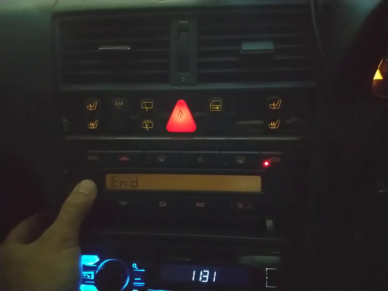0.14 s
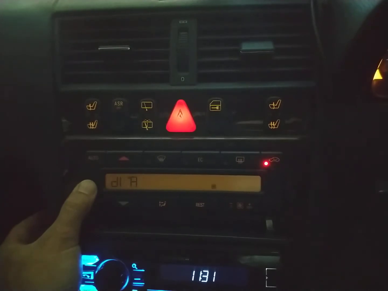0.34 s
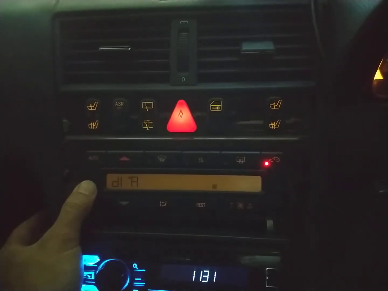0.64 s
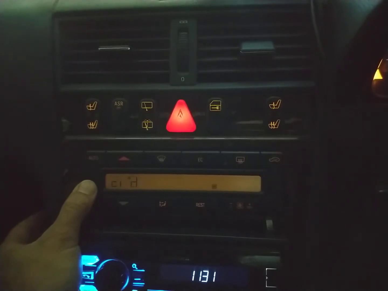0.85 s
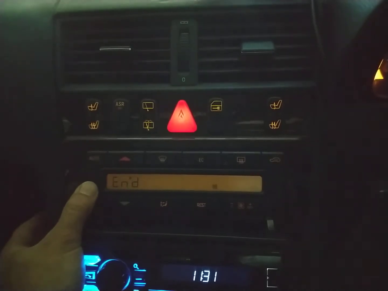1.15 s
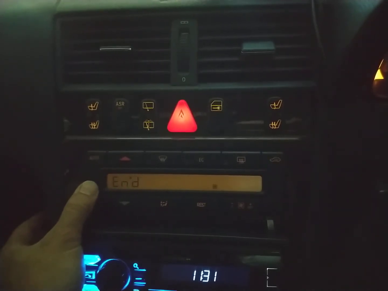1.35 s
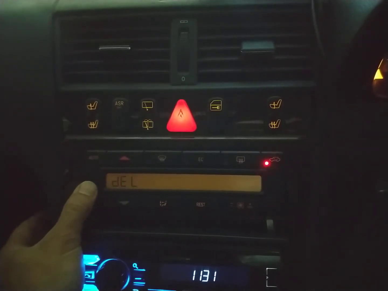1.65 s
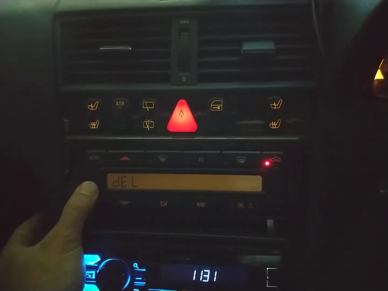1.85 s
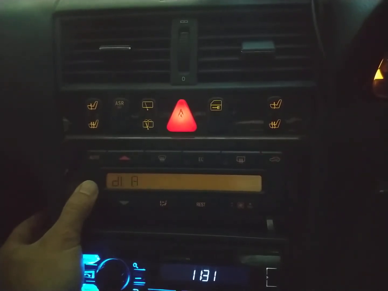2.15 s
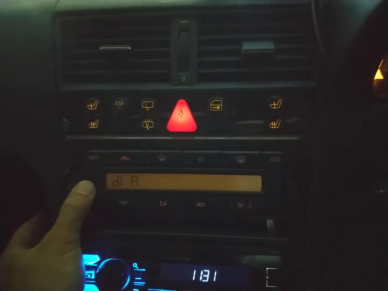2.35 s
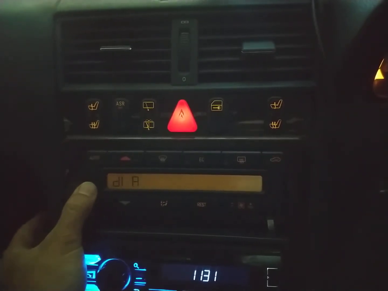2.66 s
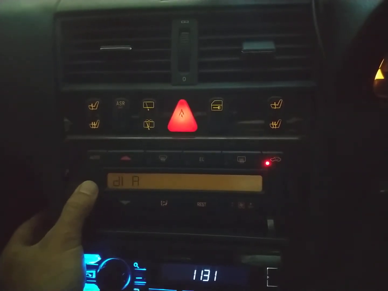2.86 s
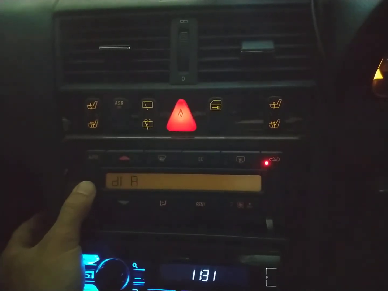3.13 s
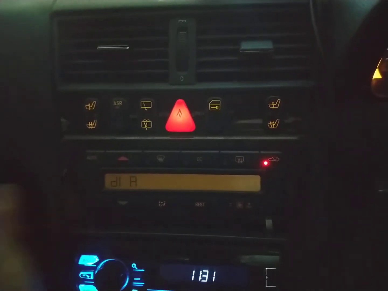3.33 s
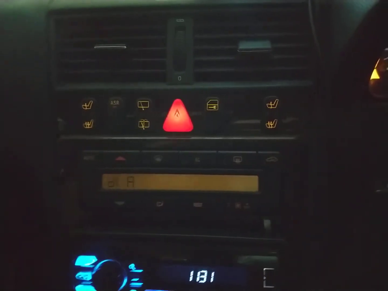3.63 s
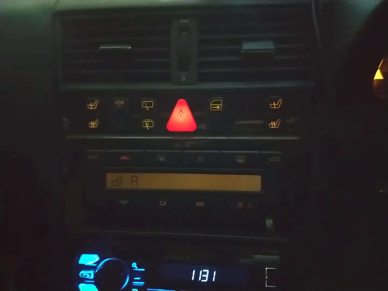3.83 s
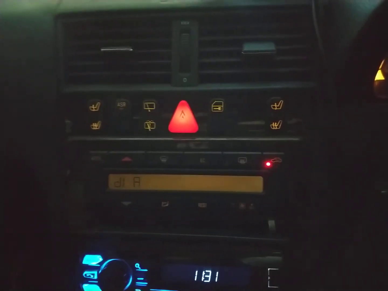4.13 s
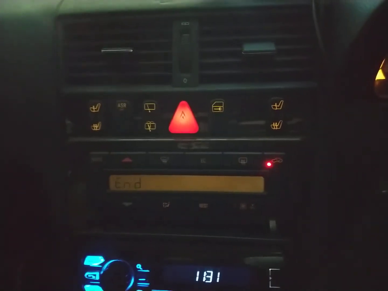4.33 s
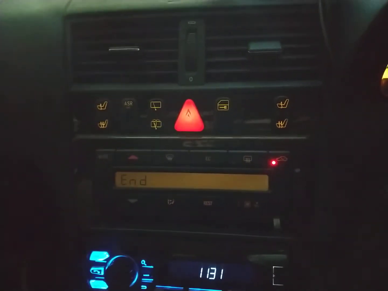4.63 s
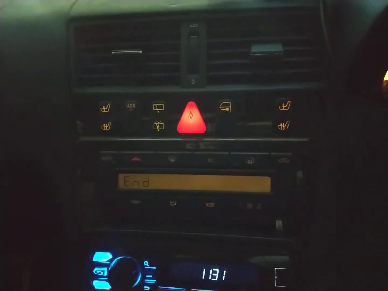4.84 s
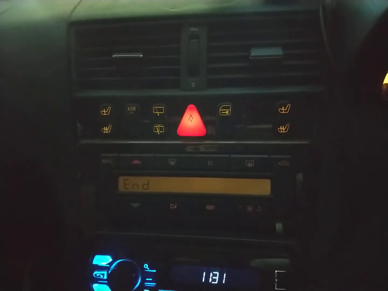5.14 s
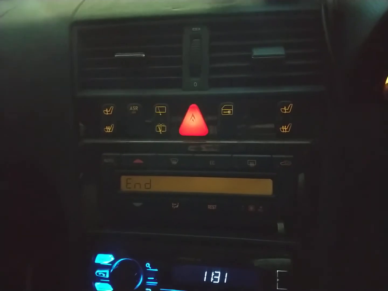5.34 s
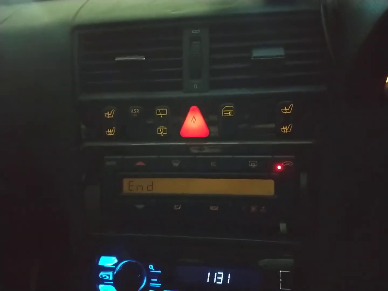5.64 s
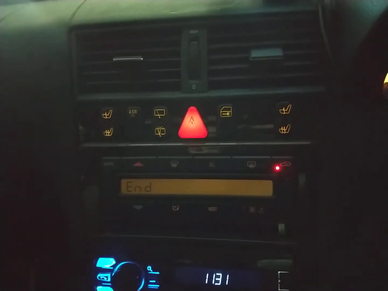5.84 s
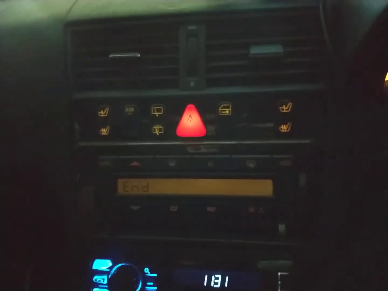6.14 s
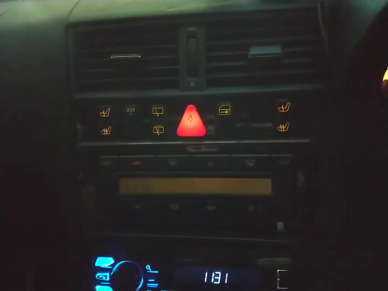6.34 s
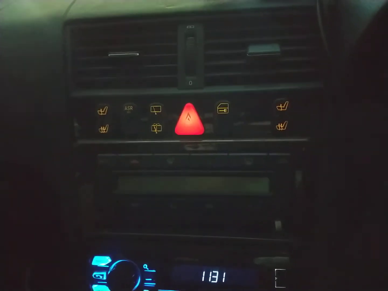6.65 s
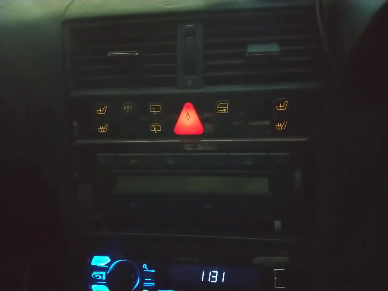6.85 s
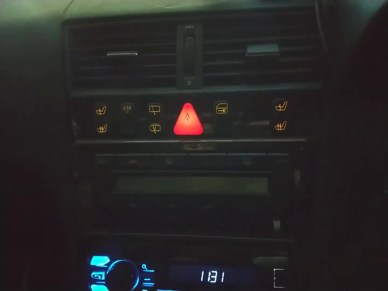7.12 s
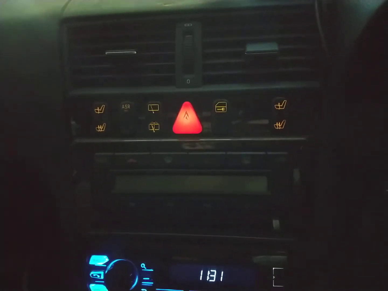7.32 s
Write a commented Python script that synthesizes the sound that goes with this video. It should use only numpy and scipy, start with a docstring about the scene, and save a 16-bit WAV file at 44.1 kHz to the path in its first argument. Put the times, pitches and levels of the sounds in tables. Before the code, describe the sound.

In a hushed closed car, a panel button snaps down and pops back five times; light handling ticks follow, then an ignition clack and faint relay.

```python
"""Climate button in a quiet car cabin

Inside a closed car, a thumb presses and releases a plastic button on the climate panel five times.
Each stroke is a shaped burst of contacts that rings the fascia's modes and thumps the dashboard's low ones.
Then come soft knocks on the trim, creaks and ticks on the microphone's own case, and the ignition key
clacking off with a short jingle of its modes; a relay under the dash follows.
Underneath lie filtered-noise cabin air and a faint low hum that sinks slowly."""
import sys
import numpy as np
from scipy import signal
from scipy.io import wavfile
from scipy.ndimage import uniform_filter1d

SR = 44100
rng = np.random.default_rng(int(sys.argv[2]) if len(sys.argv) > 2 else 0)


def store_pcm(level_fs):
    """Save levels as 16-bit WAV."""
    pcm = np.round(np.clip(level_fs, -1, 1) * 32767).astype(np.int16)
    wavfile.write(sys.argv[1], SR, np.atleast_2d(pcm).T)


N = 329850
T = np.arange(N) / SR
RING = T[:6144]  # time axis of one short sound, in seconds


def gain_of(db):
    """Decibels to an amplitude factor."""
    return 10 ** (np.asarray(db) / 20)


def unit(x):
    """Scales to energy 1."""
    return x / np.sqrt(np.sum(x ** 2) + 1e-20)


def read(points, hz):
    """Reads a curve of (hz, value) points on a log-frequency axis."""
    f, value = np.transpose(points)
    return np.interp(np.log(hz + 1), np.log(f + 1), value)


def add(mix, s, sound):
    """Mixes a sound in at time s."""
    part = mix[max(round(s * SR), 0):][:len(sound)]
    part += sound[:len(part)]


def causal(spectrum, gain):
    """Applies a gain with minimum phase, so that attacks stay sharp."""
    log_response = np.conj(signal.hilbert(np.log(gain)))
    return np.fft.ifft(spectrum * np.exp(log_response)).real


def coloured(x, points, size=4096):
    """Filters with the given spectrum, all of it scaled by 0.62."""
    hz = abs(np.fft.fftfreq(size, 1 / SR))
    kernel = causal(0.62, gain_of(read(points, hz)))
    return signal.oaconvolve(x, kernel)[:len(x)]


def even(x, size=80):
    """Gives a burst the same energy in every band, keeping its fine structure."""
    z = np.fft.fft(x, 2 * len(x))
    power = uniform_filter1d(abs(z) ** 2, 2 * size, mode="wrap")
    power = uniform_filter1d(power, size, mode="wrap")
    return unit(causal(z, (power + 1e-12) ** -.5)[:len(x)])


def drift(rate_hz, count=20):
    """Slow random wandering of rms 1, a sum of sines up to rate_hz."""
    t = np.linspace(0, T[-1], count * count)
    rates = np.geomspace(rate_hz / 10, rate_hz, count)
    waves = sum(np.sin(2 * np.pi * (f * t + rng.random())) for f in rates)
    return np.interp(T, t, waves / waves.std())


def ring(modes, scatter=1):
    """Dying sines that build up in a fraction of a cycle, their phases scattered by the path to the ear."""
    body = np.zeros(len(RING))
    for hz, db, t60 in modes:
        envelope = gain_of(db - 60 * RING / t60) * (1 - np.exp(-2 * hz * RING))
        body += envelope * np.sin(2 * np.pi * (hz * RING + scatter * rng.random()))
    return unit(body)


def chatter(t60):
    """A dying burst of tiny contacts and reflections."""
    return even(rng.standard_normal(len(RING)) * gain_of(-60 * RING / t60))


# how fast the padded cabin falls silent: pitch_hz, t60_s
CABIN_DECAY = [(100, 0.14), (400, 0.14), (1500, 0.065), (4000, 0.076), (8000, 0.095), (14000, 0.073)]


def cabin_tail(size=128):
    """The short reverberation of the padded cabin: noise that dies at its own rate in each band."""
    hz, t, z = signal.stft(rng.standard_normal(len(RING)), SR, nperseg=size)
    decay = gain_of(-60 * t / read(CABIN_DECAY, hz)[:, None])
    tail = signal.istft(z * decay, SR, nperseg=size)[1][:len(RING)]
    return unit(tail * (1 - np.exp(-RING / 0.0022)))  # reflections gather over a few ms


def blows(rows, colour, modes, crack_db, chatter_db, chatter_t60, room_db, variety=0.53):
    """A blow is a crack, chatter, the object's modes and the cabin's answer; blows on one object are alike.

    Rows: start_s, level_db (energy with ringing and blow weighed separately), bright_db_per_octave, ring_db."""
    out = np.zeros(N)
    body, burst, room = ring(modes), chatter(chatter_t60), cabin_tail()
    for s, db, bright, ring_db in rows:
        crack = gain_of(crack_db) * (RING == 0)
        contact = crack + gain_of(chatter_db) * unit(burst + variety * chatter(chatter_t60))
        heard = even(contact + gain_of(room_db) * unit(room + variety * cabin_tail()))
        ringing = gain_of(ring_db) * unit(body + variety * ring(modes))
        sound = unit(coloured(heard, colour)) + ringing
        # brightness pivots at 2 kHz; the ringing adds its energy to the level
        tilt = [(hz, bright * np.log2(hz / 2000)) for hz in (250, 16000)]
        add(out, s, gain_of(db) * np.linalg.norm(sound) * unit(coloured(sound, tilt)))
    return out


def alike(rows, bright, ring_db):
    """Gives blows of one kind the same brightness (dB per octave) and ringing."""
    return [(s, db, bright, ring_db) for s, db in rows]


# spectrum of the cabin air: pitch_hz, level_db (relative, per Hz)
AIR_COLOUR = [(12, -54), (24, -33.5), (38, -7), (70, -7), (110, -10), (170, -14.5), (230, -16), (513, -19),
              (865, -22), (1500, -26), (3720, -30), (8000, -34.5), (10500, -37.5), (14300, -34)]
AIR_DB = -66  # rms of the air between 200 and 2000 Hz


def air():
    """Steady rumble and hiss of the closed cabin, as filtered noise."""
    noise = coloured(rng.standard_normal(N), AIR_COLOUR, size=16384)
    band = signal.butter(4, [200, 2000], "band", fs=SR, output="sos")
    middle = signal.sosfilt(band, noise)
    return noise / middle.std() * gain_of(AIR_DB)


HUM_HZ, HUM_SINKS_S, HUM_SAG_HZ_PER_S = 57.2, 2.8, 4.5  # holds its pitch, then sinks steadily
# course of the low hum, around which it wavers: time_s, level_db (rms)
HUM_LEVEL = [(0, -59.5), (.4, -57), (1.8, -54), (2.4, -55), (2.7, -61.5), (4.2, -68), (7.48, -72)]


def hum():
    """A low tone that sinks and fades, and a fainter steady one above it, both wavering slightly."""
    hz = HUM_HZ - HUM_SAG_HZ_PER_S * np.maximum(T - HUM_SINKS_S, 0)
    turns = np.cumsum(hz + 0.44 * drift(3.5)) / SR
    low_db = np.interp(T, *np.transpose(HUM_LEVEL)) + .8 * drift(8)
    low = gain_of(low_db) * np.sin(2 * np.pi * turns)
    steady_turns = np.cumsum(142 + 1.5 * drift(6)) / SR
    steady = gain_of(-72 + 2 * drift(5)) * np.sin(2 * np.pi * steady_turns)
    return np.sqrt(2) * (low + steady)  # rms level to sine peak


# the hand brushing along trim and keys: start_s, length_s, level_db (rms at mid-stroke, before flutter)
BRUSHES = [(3.735, 0.18, -63), (4.328, 0.26, -68.5), (5.34, 0.19, -69)]
# skin sliding on trim and keys: pitch_hz, level_db (relative, per Hz)
BRUSH_COLOUR = [(200, -30), (1600, -12), (2120, 8.5), (2500, -7), (3600, 5.5), (5500, -2), (8000, 1.5),
                (10000, -12), (14000, -15)]


def brushes():
    """Soft, uneven hiss of skin sliding: filtered noise that swells, fades and flutters."""
    strokes = np.zeros(N)
    for s, length, db in BRUSHES:
        add(strokes, s, gain_of(db) * np.hanning(int(length * SR)))
    hiss = coloured(rng.standard_normal(N), BRUSH_COLOUR)
    return strokes * hiss / hiss.std() * gain_of(2 * drift(25))


# modes of the fascia, also rung by scuffs and button: pitch_hz, level_db (relative), t60_s
FASCIA_MODES = [(605, -1.5, 0.11), (1046, -6, 0.078), (1423, 4, 0.073), (1667, -11, 0.1),
                (2110, 6.5, 0.025), (2580, -19, .045), (2723, 17.5, 0.015), (3390, -15, 0.081),
                (3000, -47, .055), (3490, 2, 0.03), (3554, 16.5, 0.012), (4000, -19, 0.03),
                (4650, -14, 0.095), (7120, 3, 0.022)]
# the relay pulling and settling: start_s, level_db (energy before ringing), bright_db_per_octave
RELAY = [(6.9650, -23.5, -2), (6.98, -26, 5)]
# the relay behind its trim: pitch_hz, level_db (relative, per Hz)
RELAY_COLOUR = [(250, -16), (650, 0), (1500, -3), (2400, 5.5), (3100, -3.5), (3600, 3), (4300, -8),
                (7400, -6), (8500, -16), (14000, -33)]


def relay():
    """A relay under the dash pulls and settles, mostly heard by way of the cabin."""
    rows = [(*row, -17) for row in RELAY]  # ring_db
    return blows(rows, RELAY_COLOUR, FASCIA_MODES,
                 crack_db=-22, chatter_db=-1, chatter_t60=0.035, room_db=1)


# modes of the microphone's case, also rung by the ticks: pitch_hz, level_db (relative), t60_s
CASE_MODES = [(524, -4, 0.016), (1124, 1.5, 0.0089), (3440, -3, 0.0091)]
# creaks as the grip shifts: start_s, level_db (energy before ringing)
CREAKS = [(4.3695, -24), (4.3835, -34), (4.3992, -31), (4.4150, -26), (4.4258, -28)]
# the case creaking: pitch_hz, level_db (relative, per Hz)
CREAK_COLOUR = [(100, 2), (900, -10), (2400, 0.5), (3300, -3.5), (4100, 3.5), (4900, -13), (8000, -11),
                (11000, -26)]


def creaks():
    """The microphone's case creaks in small dull contacts as the grip shifts."""
    return blows(alike(CREAKS, bright=-2.95, ring_db=-17), CREAK_COLOUR, CASE_MODES,
                 crack_db=-5, chatter_db=-1, chatter_t60=0.0049, room_db=-19)


# ticks on the case: start_s, level_db (energy before ringing), bright_db_per_octave, ring_db
TICKS = [(4.5774, -13, 0, -2), (4.5885, -18.5, -2, -10), (4.6168, -7.5, 1, -7.5)]
# a tick on the case: pitch_hz, level_db (relative, per Hz)
TICK_COLOUR = [(100, 3.5), (300, -3), (560, -6), (800, -13.5), (1150, -7), (1650, -5.5), (2200, -0.5),
               (3000, -7), (3550, -1.5), (5000, -5.5), (6800, -7.5), (8300, -1), (9900, -14.5),
               (14000, -13)]


def ticks():
    """Ticks right on the microphone's case: a strong crack, little chatter and hardly any cabin."""
    return blows(TICKS, TICK_COLOUR, CASE_MODES,
                 crack_db=9, chatter_db=-6, chatter_t60=0.0067, room_db=-18)


# scuffs just before the knocks: start_s, level_db (energy before ringing)
SCUFFS = [(3.1700, -18.5), (3.3395, -20.5), (3.3455, -23), (3.5220, -24.5)]
# skin scuffing plastic: pitch_hz, level_db (relative, per Hz)
SCUFF_COLOUR = [(100, -36), (350, 1), (650, 7.5), (950, 0.5), (1300, 2.5), (1600, -11), (2200, 3),
                (2700, -22), (3450, -3.5), (5500, -21), (8000, -15), (11000, -32)]


def scuffs():
    """The hand scuffs the plastic: chatter that dies slowly and barely rings the fascia."""
    return blows(alike(SCUFFS, bright=.2, ring_db=-20), SCUFF_COLOUR, FASCIA_MODES,
                 crack_db=-14, chatter_db=2, chatter_t60=0.05, room_db=-6)


# knocks on the trim: start_s, level_db (energy before ringing), bright_db_per_octave, ring_db
KNOCKS = [(3.1755, -18, 1.5, -4.5), (3.3475, -17.5, 1.5, 5.5), (3.5305, -14, -2, -6)]
# a soft knock: pitch_hz, level_db (relative, per Hz)
KNOCK_COLOUR = [(60, -40), (190, -10), (280, 1.5), (400, 0), (700, -8), (1100, -17.5), (1500, -12),
                (2100, -22), (3500, -17.5), (8000, -41), (14000, -56)]
# modes of the trim: pitch_hz, level_db (relative), t60_s
TRIM_MODES = [(241, -2, 0.1), (270, -3.5, 0.15), (350, -17, .06), (457, -8.5, 0.12), (574, -13, 0.085),
              (760, -20, 0.046)]


def knocks():
    """Soft knocks on the trim: almost no crack, a dull burst and low modes."""
    return blows(KNOCKS, KNOCK_COLOUR, TRIM_MODES,
                 crack_db=-28, chatter_db=2.5, chatter_t60=0.029, room_db=-2)


# ignition lock and hanging keys: start_s, level_db (energy before ringing), bright_db_per_octave, ring_db
CLACKS = [(3.4865, -33, -1.5, -8), (5.535, -29.5, -3.5, -8), (5.690, -35, -2.5, -19),
          (5.763, -36, -4.5, -15), (5.811, -40, -2, 2), (5.835, -37, 1, 0), (6.3700, -18, -2, -22),
          (6.3765, -7.5, -1.5, -12), (6.3805, -6.5, 3, -12)]
# a clack of lock or keys: pitch_hz, level_db (relative, per Hz)
CLACK_COLOUR = [(40, -37), (100, -17), (200, 1.5), (340, -3.5), (720, 4.5), (900, -6), (1080, -1),
                (1350, -9), (1850, 2.5), (2800, -13), (3600, -0.5), (5200, -7.5), (7200, 5), (10000, -15),
                (14000, -17)]
# modes of the keys: pitch_hz, level_db (relative), t60_s
KEY_MODES = [(200, -5, 0.13), (2200, -14, 0.1), (3450, 4, 0.081), (4270, -10, 0.1), (5329, -11, 0.088),
             (5930, -5, 0.11), (6500, -10, 0.074), (6720, -9, 0.1), (7080, -6, 0.13), (7060, -8, 0.1),
             (7300, 2, 0.14), (8000, -17, .09), (8450, -7, 0.13)]


def clacks():
    """The ignition key clacks and the hanging keys jingle in high modes, each blow unlike the last."""
    return blows(CLACKS, CLACK_COLOUR, KEY_MODES,
                 crack_db=-8.5, chatter_db=3.0, chatter_t60=0.027, room_db=-2.0, variety=3.4)


# low modes of the dashboard: pitch_hz (before each thump's factor), level_db (relative), t60_s
DASHBOARD_MODES = [(97, 2.5, 0.042), (115.1, 2.5, 0.093), (132, -5, 0.053)]


def thump(db, pitch):
    """The dashboard's low modes, shifted by a pitch factor, swell and die."""
    modes = [(hz * pitch, level, t60) for hz, level, t60 in DASHBOARD_MODES]
    body = ring(modes, scatter=0)
    return gain_of(db) * unit(body * (1 - np.exp(-RING / 0.0065)))


THUMP_LAG_S = 0.011  # the dashboard answers this long after the switch
PUSH_THUMP_DB, PUSH_PITCH = -16, .955  # energy, factor on the modes' pitch
LIFT_THUMP_DB, LIFT_PITCH = -19, 0.92
# other bumps that reach the dashboard: start_s, level_db (energy), pitch_factor
BUMPS = [(3.496, -23, 1.26), (4.211, -25.5, 1.45), (4.387, -21, 0.67), (4.579, -17.5, 0.63),
         (4.623, -21.5, 0.65), (6.377, -19, 1.22)]


def dashboard():
    """The dashboard takes up the thumb's force at a push and returns it at release; other bumps shake it too."""
    out = np.zeros(N)
    for pressed, _, let_go, *_ in PRESSES:
        add(out, pressed + THUMP_LAG_S, thump(PUSH_THUMP_DB, PUSH_PITCH))
        add(out, let_go + THUMP_LAG_S, thump(LIFT_THUMP_DB, LIFT_PITCH))
    for s, db, pitch in BUMPS:
        add(out, s, thump(db, pitch))
    return out


SNAP_RING_DB, RELEASE_RING_DB, STOP_RING_DB = -10.5, -7, -3  # fascia ringing against the stroke
STOP_BELOW_DB = -7  # the stop against the release before it
GENTLE_DB, BRIGHTER_PER_DB = -19, 0.45  # a release gains dB per octave with each dB above a gentle one
# each push: press_s, snap_db, release_s, release_db (energies before ringing), travel_s to the outer stop
PRESSES = [(0.2148, -4.4, 0.4144, -18.2, .0233), (0.8344, -4.3, 1.0226, -17.8, .0258),
           (1.4451, -5.7, 1.6683, -18.3, .0235), (2.1444, -5.4, 2.3434, -14, .0131),
           (3.0071, -4.4, 3.1756, -15.2, .0091)]
# faint ticks as the thumb shifts its weight: start_s, level_db (energy before ringing)
NUDGES = [(2.0394, -39), (2.3033, -39.5), (2.8046, -39)]
# the switch snapping over: pitch_hz, level_db (relative, per Hz)
SNAP_COLOUR = [(200, -22), (500, -12), (950, -4), (2250, -4.5), (2600, 0), (2950, -2.5), (3300, 6),
               (4400, -12), (5100, -9), (6300, -12), (7400, -4.5), (8700, -10), (10000, -20),
               (14000, -19.5)]
# the button's spring: pitch_hz, level_db (relative, per Hz)
RELEASE_COLOUR = [(250, -16.5), (560, 4), (800, -5.5), (1150, -7.5), (1720, 4.5), (2200, -14), (2620, 7),
                  (3000, -7.5), (3800, -1.5), (5300, -15), (6900, -17), (7500, -8), (8400, -11.5),
                  (9700, -30), (14000, -28)]
# the button's outer stop: pitch_hz, level_db (relative, per Hz)
STOP_COLOUR = [(300, -12), (1420, -0.5), (2250, -15), (2700, -7), (3050, -9), (3500, 3), (4300, -10),
               (6000, -20), (7500, -23), (8500, -3.5), (9700, -27), (14000, -34)]


def button():
    """The switch slides and snaps over; let go, it pops back and meets its stop, brighter when let go briskly."""
    down, up, home = [], [], []
    for pressed, snap_db, let_go, release_db, travel in PRESSES:
        down.append((pressed, snap_db))
        bright = BRIGHTER_PER_DB * (release_db - GENTLE_DB)
        up.append((let_go, release_db, bright, RELEASE_RING_DB))
        home.append((let_go + travel, release_db + STOP_BELOW_DB))
    home.extend(NUDGES)  # the nudges tick against the same stop
    down = alike(down, bright=-0.32, ring_db=SNAP_RING_DB)
    home = alike(home, bright=-.3, ring_db=STOP_RING_DB)
    snaps = blows(down, SNAP_COLOUR, FASCIA_MODES,
                  crack_db=-6.5, chatter_db=0, chatter_t60=0.023, room_db=-9, variety=0.66)
    releases = blows(up, RELEASE_COLOUR, FASCIA_MODES,
                     crack_db=-34, chatter_db=0.5, chatter_t60=0.023, room_db=-6.5)
    stops = blows(home, STOP_COLOUR, FASCIA_MODES,
                  crack_db=-14, chatter_db=-1.5, chatter_t60=0.025, room_db=-11)
    slide = np.zeros(N)
    for s, *_ in down + up:  # sliding starts 3 ms before each stroke
        add(slide, s - .003, gain_of(-29) * unit(coloured(chatter(0.084), SNAP_COLOUR)))
    return snaps + releases + stops + slide


def sideways(x, db):
    """Nearby surfaces scatter a sound into a short blur, here for the sides."""
    return gain_of(db) * signal.oaconvolve(x, chatter(.004))[:N]


# side gain of the scattered sounds: pitch_hz, gain_db (before the filter's common 0.62)
SCATTER_WIDTH = [(100, -78), (3900, -66), (5200, -30), (7500, -13.5), (14000, -10)]
# side gain of the cabin air: pitch_hz, gain_db (before the filter's common 0.62)
AIR_WIDTH = [(100, -60), (2600, -48), (4300, -28), (6500, -0.5), (14000, 0)]


def scene():
    """All sources are central before the microphone; chiefly the treble spreads to the sides."""
    panel = button() + dashboard() + knocks() + scuffs() + relay() + brushes()
    keys = clacks()
    mid = panel + ticks() + creaks() + keys + air() + hum()
    scattered = sideways(panel, -2.5) + sideways(keys, -27)
    side = coloured(scattered, SCATTER_WIDTH) + coloured(air(), AIR_WIDTH)
    return np.array([mid + side, mid - side])


EDGE_HZ = 14400


def record(dry):
    """The recorder's band limit: a steep low-pass."""
    lowpass = signal.firwin(301, EDGE_HZ, window=("kaiser", 8), fs=SR)
    return signal.oaconvolve(dry, lowpass[None], "same")


dry = scene()
out = record(dry)
store_pcm(out)
```